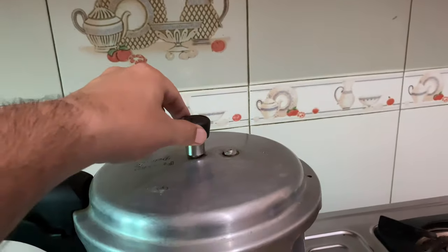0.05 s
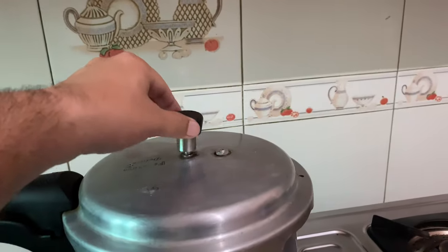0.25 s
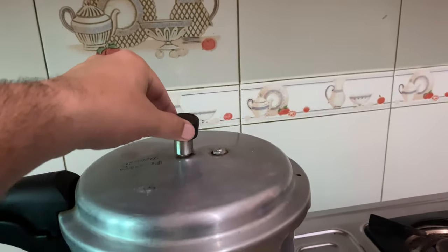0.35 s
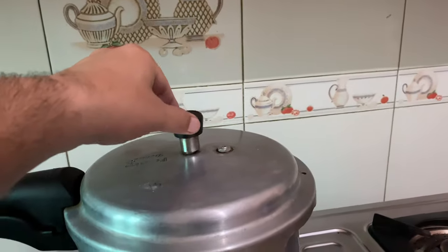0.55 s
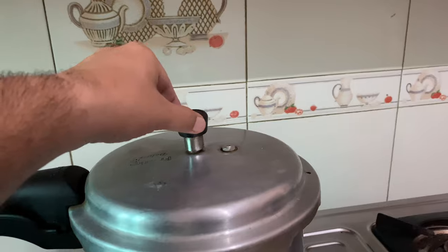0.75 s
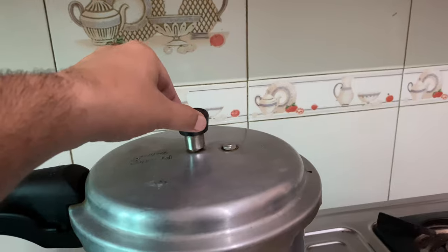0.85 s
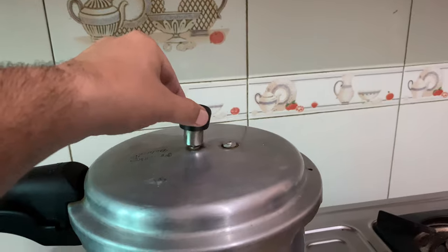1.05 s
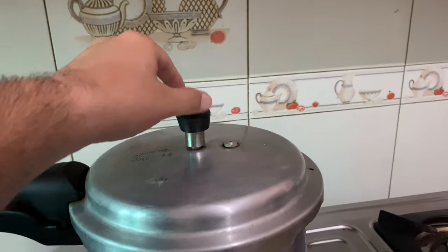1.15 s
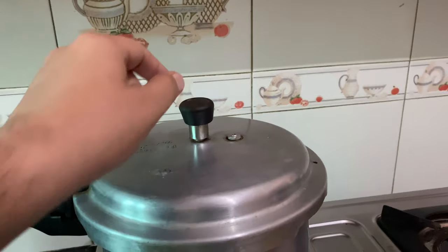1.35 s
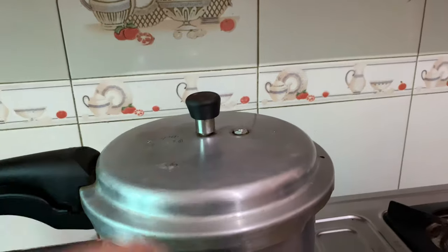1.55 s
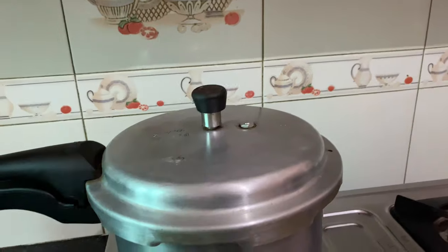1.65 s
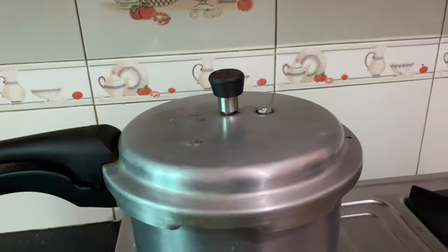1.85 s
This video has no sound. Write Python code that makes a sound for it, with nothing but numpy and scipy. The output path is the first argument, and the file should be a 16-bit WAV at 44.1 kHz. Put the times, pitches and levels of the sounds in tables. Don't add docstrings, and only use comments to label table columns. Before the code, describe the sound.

Pressure cooker steam escapes in three bright, abrupt hisses: a full burst at about 0.2-0.4 seconds, a quicker one at 0.65-0.8, and a softer one at 0.95-1.17. Light metal ticks come at 0.1; clustered clacks and scrapes of the weight on its pipe end each burst, strongest near 1.16. Short tiled-kitchen echoes fade into faint low hum. Close stereo phone pickup.

```python
import sys
import numpy as np
from scipy import signal
from scipy.fft import rfft, irfft
from scipy.io import wavfile
from scipy.ndimage import uniform_filter1d

SR = 44100
rng = np.random.default_rng(int(sys.argv[2]) if len(sys.argv) > 2 else 0)


def inscribe(sig):
    pcm = np.round(np.clip(np.atleast_2d(sig).T, -1, 1) * 32767)
    wavfile.write(sys.argv[1], SR, pcm.astype(np.int16))


def linear_from_db(decibels):
    return 10 ** (np.asarray(decibels, float) / 20)


N = 83790

# frequency in Hz, level in dB per Hz.
HUM_SPECTRUM = [(25, -48.5), (70, -3), (126, 2.5), (371, -8), (1090, -7.5), (3000, -14.5), (6000, -33.5),
                (15000, -38)]
# frequency in Hz, level in dB, width in Hz.
DRONE_TONES = [(119, -57, 11), (85.4, -60.5, 8.7), (153.7, -63.5, 5), (232, -64.5, 51)]
# frequency in Hz, time to fall 60 dB in seconds.
WALL_DECAY = [(250, 0.83), (1000, 0.42), (4000, 0.43), (8000, 0.32), (14000, 0.26)]

# start in seconds, level in dB, contact in seconds,
# pipe ring in dB, weight ring in dB.
TOUCHES = [ (.092, -39, .003, 9, 2), (.0938, -32, .0045, 6, 2), (.245, -42, 0.017, -1, -29),
           (.323, -34.5, 0.0081, -6.5, -26.5), (0.3829, -25, 0.0049, -12, -19),
           (.393, -25.5, 0.0035, -22, 2.5), (0.3998, -27, 0.0015, 7.5, -16), (.404, -27.5, 0.0038, 7, 1),
           (.412, -26.5, 0.001, 4.5, -13), (.419, -32, 0.001, 0, -15), (.429, -33.5, 0.0045, -18, -19),
           (0.458, -28.5, 0.0036, -14, -4.5), (.466, -35.5, 0.018, -9, -10), (.616, -48, .008, -14, -16),
           (.671, -27.5, 0.0092, -6, -11.5), (.771, -26, 0.01, 4, -13), (0.7746, -26.5, 0.0035, -6, -1.5),
           (.779, -23, 0.0047, -0.5, 1), (0.786, -26.5, 0.0034, 2, 2), (.791, -30, 0.0084, -1.5, -15),
           (.821, -33, 0.0039, -16, -10), (0.987, -43, 0.016, -14, -4.5), (1.038, -35.5, 0.006, 6.5, -19),
           (1.049, -35.5, 0.018, 1, -19), (1.088, -26, 0.0083, 4.5, -6), (1.092, -28.5, 0.0056, 0, -11),
           (1.103, -34.5, 0.0043, 12.5, 0.5), (1.1399, -23.5, 0.0037, -6, 3), (1.146, -28, 0.0091, 6, -11),
           (1.152, -24.5, 0.0048, 1, -11), (1.156, -29.5, .004, 3.5, -2), (1.16, -20.5, 0.0031, 0.5, 2.5),
           (1.167, -20, 0.0035, -0.5, 6.5), (1.174, -34, 0.002, 2, -4), (1.189, -44.5, 0.024, -18, -27), ]
# frequency in Hz, level in dB, time to fall 60 dB in seconds.
LID_MODES = [(161, -31, 0.42), (210.2, -25.5, 0.22), (294.2, -17, 0.14), (429.7, -8.5, 0.039),
             (573.4, -9, 0.0365), (710.7, -14.5, 0.11), (912, -4.5, 0.0297), (1039, -0.5, 0.013),
             (1252.5, 1.5, 0.014), (1481, 0.5, 0.0052), (1735, -3.5, 0.014), (2245, -3.5, 0.0034),
             (2464, -12, 0.088), (2654, -10, 0.056)]
PIPE_MODES = [(2850, -13, .01), (3120, -11, .012), (3470, -4, .018), (3700, -3.5, .011), (3850, -3, .011),
              (4100, -9, .012), (4550, -13, .012), (5300, -13, .01)]
WEIGHT_MODES = [(6310, -3.5, 0.0035), (6920, -6.5, 0.013), (7880, -16.5, 0.0044), (10360, -22, .004),
                (13200, -68, .003)]

# time in seconds, jet strength in dB.
LIFTS = [
    [(.175, -62), (.204, -31.5), (.238, -21), (.262, -15), (.29, -17.5), (.33, -16.5), (.37, -16),
     (.405, -29), (.43, -84)],
    [(.636, -60), (.645, -38), (.654, -31), (.668, -18.5), (.685, -17), (.73, -18.5), (.765, -17.5),
     (.79, -30), (.82, -83)],
    [(.925, -66.5), (.95, -31.5), (.984, -22), (1.04, -21), (1.09, -19), (1.12, -21), (1.15, -18),
     (1.17, -37), (1.19, -89.5)],
]
# frequency in Hz, level in dB per Hz.
JET_SPECTRUM = [(300, -23.5), (1000, -8), (2500, -6.5), (4500, -6), (7500, 0), (9500, 2), (10800, -7),
                (15500, -9.5)]
# frequency in Hz, width in Hz, boost in dB.
CAVITIES = [(3650, 1000, 4), (5240, 130, 7), (5820, 190, 7.5), (8210, 1200, 4.5), (8870, 340, 7.5),
            (9335, 310, 8), (12930, 1600, 9.5)]
# frequency in Hz, factor.
NARROWING = [(1000, 0.74), (4000, 1.66), (6500, 1.45), (9000, 0.85), (14000, 0.82)]
FIZZ_TIMES = [
    (.19, .255),
    (.65, .745),
    (1.055, 1.085),
]
# time in seconds, frequency in Hz.
CANCEL_PATH = [(.21, 3350), (.245, 3150), (.265, 2830), (.35, 2820), (.39, 2740), (.66, 3020), (.79, 3020),
               (.95, 2780), (1.045, 2780), (1.06, 2940), (1.14, 2960)]

# frequency in Hz, lead in radians.
LEFT_LEAD = [(0, 0), (1000, 1.2), (2300, 6.28), (2600, 8.6), (3000, 9.42), (3450, 10.3), (4350, 12.57),
             (6500, 12.4), (7900, 11.8), (9000, 8.8), (15100, -3.14), (15600, -5.5)]
# frequency in Hz, left over right in dB.
LEFT_TILT = [(600, -0.5), (1000, 0.5), (2400, -2.4), (3800, 2), (5600, -4.5), (8000, -0.2)]
# frequency in Hz, likeness from 0 to 1.
STEAM_LIKENESS = [(250, .97), (1000, .88), (1900, .6), (2300, .9), (2550, .99), (3450, .99), (4800, .55),
                  (7500, .6), (8600, .85)]
TOUCH_LIKENESS = [(250, .96), (1000, .88), (2400, .5), (3000, .1), (3800, .6), (4500, .35), (5300, .7),
                  (7900, .55), (8800, .85)]
ECHO_LIKENESS = [(250, 1), (700, 0.5), (1500, 0.12), (7000, 0.111), (9000, 0.37)]
HUM_LIKENESS = [(40, .8), (90, .98), (150, .99), (500, .5), (1000, .07), (6000, .1), (9000, .42)]
# frequency in Hz, level under the other in dB.
SPARE_LIMIT = [(1900, -30), (2300, -9), (2650, -6), (2880, -5.5), (3020, -8), (3300, -7), (4000, -10),
               (9300, -14), (9800, -5.5), (14500, -5.5), (15400, -12), (16000, -16)]

HUM_DB, STEADY_S = -51.5, .08
WET_DB, WALL_S = -6, 0.004
TICK_DB, LOW_HZ = -5, 130
ROUGH_DB, UNEVEN_DB = 2.5, 2.5
DETUNE = .025
PATCH_DB, SPUTTER_DB, WHISTLE_DB = 1.2, 1.3, 0.5
FIZZ_HZ, SHUT_DB = 15000, -30
CANCEL_HZ, CANCEL_SPAN_HZ = 3000, 600
TOP_HZ, TOP_LIKENESS = 9400, .95
EDGE_HZ = 15850


def evened(x):
    return x / np.sqrt(np.mean(x ** 2) + 1e-20)


def read(points, hz):
    f, value = np.transpose(points)
    return np.interp(np.log(hz + 1), np.log(f + 1), value)


def resonate(x, hz, width):
    turn = np.exp(2j * np.pi * hz * np.arange(x.shape[-1]) / SR)
    r = np.exp(-np.pi * abs(width) / SR)
    return 2 * (turn * signal.lfilter([1 - r], [1, -r], x / turn)).real


def hum():
    noise = rng.standard_normal((2, 2, N))
    colour = linear_from_db(read(HUM_SPECTRUM, np.fft.rfftfreq(N, 1 / SR)))
    wide = linear_from_db(HUM_DB) * evened(irfft(rfft(noise[0]) * colour, N))
    low = sum(linear_from_db(db) * evened(resonate(noise[1], hz, width)) for hz, db, width in DRONE_TONES)
    bass = signal.sosfilt(signal.butter(2, 200, fs=SR, output="sos"), wide) + low
    level = np.sqrt(abs(uniform_filter1d(bass ** 2, size=round(STEADY_S * SR))) + 1e-12)
    return wide + low + bass * (level.mean() / level - 1) / 2


def kitchen(x):
    taps = np.zeros((2, SR))
    at = np.arange(0, SR - 20, 20) + rng.integers(0, 20, (2, (SR - 1) // 20))
    np.put_along_axis(taps, at, rng.choice([-1., 1.], at.shape), axis=1)
    after_wall = np.arange(SR) > WALL_S * SR
    hz, t, z = signal.stft(taps * after_wall, SR, nperseg=256)
    decay = linear_from_db(-60 * t / read(WALL_DECAY, hz)[:, None])
    tail = signal.istft(z * decay, SR, nperseg=256)[1]
    return signal.fftconvolve(x, tail / np.linalg.norm(tail[0]), axes=1)[:, :N]


def touches():
    out, t = np.zeros((2, N + 6000)), np.arange(6000) / SR
    count = len(TOUCHES)
    grits, lumps = rng.standard_normal((2, count, 2, 1000))
    uneven, phases = rng.standard_normal((count, 3, 14)), rng.random((count, 3, 14, 2, 1))
    for touch, grit, lump, odd, phase in zip(TOUCHES, grits, lumps, uneven, phases):
        s, db, contact, pipe_db, weight_db = touch
        push = np.sin(np.pi * np.clip(t[:1000] / contact, 0, 1) ** 0.69)
        push = push * linear_from_db(ROUGH_DB * evened(uniform_filter1d(lump[0], size=40)))
        push = np.pad(push / push.max(), (0, 5000))
        sound = linear_from_db(TICK_DB + weight_db) * push * np.pad(grit, ((0, 0), (0, 5000)))
        parts = [LID_MODES, PIPE_MODES, WEIGHT_MODES]
        for modes, part_db, odds, turns in zip(parts, [0, pipe_db, weight_db], odd, phase):
            for (hz, mode_db, t60), one, turn in zip(modes, odds, turns):
                swell = signal.lfilter([1], [1, -linear_from_db(-60 / t60 / SR)], push)
                level = linear_from_db(mode_db + part_db + UNEVEN_DB * one)
                pitch = hz * (1 + DETUNE * (2 * turn[0] * 7 % 2 - 1))
                sound += level * swell / swell.max() * np.sin(2 * np.pi * (pitch * t + turn))
        at = round(s * SR)
        out[:, at:at + 6000] += linear_from_db(db + 1.5) * sound
    return signal.sosfilt(signal.butter(3, LOW_HZ, "high", fs=SR, output="sos"), out[:, :N])


def steam():
    frames, hz = N // 64 + 5, np.fft.rfftfreq(256, 1 / SR)
    t = np.arange(frames) * 64 / SR
    lifts_db = [np.interp(t, *np.transpose(lift), left=-99, right=-99) for lift in LIFTS]
    jet_db = np.max(lifts_db, axis=0)
    cavity_db = sum(db / (1 + (2 * (hz - f) / width) ** 2) for f, width, db in CAVITIES)
    shape_db = read(JET_SPECTRUM, hz) + cavity_db

    draw = rng.standard_normal((frames, 129, 5)).T
    patches = uniform_filter1d(uniform_filter1d(draw[4], size=4, axis=0), size=16, axis=1)
    sputter = evened(uniform_filter1d(rng.standard_normal(frames), size=3))
    field_db = shape_db[:, None] + PATCH_DB * evened(patches) + SPUTTER_DB * sputter

    gap_db = read(NARROWING, hz)[:, None] * (jet_db + 22.5) - 23.5
    fizzing = sum((t > start) & (t < end) for start, end in FIZZ_TIMES)
    gap_db = gap_db + SHUT_DB * (hz > FIZZ_HZ)[:, None] * (1 - fizzing)
    z = (draw[:2] + 1j * draw[2:4]) * linear_from_db(field_db + gap_db) / np.sqrt(np.sum(linear_from_db(2 * shape_db)))
    hiss = signal.istft(z, nperseg=256, noverlap=192)[1][:, :N]
    lines = linear_from_db(WHISTLE_DB * evened(uniform_filter1d(rng.standard_normal(N // 2 + 1), size=60)))
    return irfft(rfft(hiss) * lines / np.sqrt(np.mean(lines ** 2)), N)


def ports(x, likeness):
    hz, z = np.fft.rfftfreq(2 * N, 1 / SR), rfft(x, 2 * N)
    same = np.clip(np.where(hz > TOP_HZ, TOP_LIKENESS, read(likeness, hz)), 0, 1)
    tilt = linear_from_db(read(LEFT_TILT, hz) / 2)
    shared = same * z[0] * np.exp(-1j * np.interp(hz, *np.transpose(LEFT_LEAD)))
    own = np.sqrt(1 - same ** 2) * z[1]
    return irfft([z[0] * tilt, (shared + own) / tilt])[:, :N]


def sway(pair):
    hz, t, z = signal.stft(pair[1], SR, nperseg=1024, noverlap=768)
    lead = np.transpose(LEFT_LEAD)
    pitch = np.interp(t, *np.transpose(CANCEL_PATH))
    turn = np.interp(CANCEL_HZ, *lead) - np.interp(pitch, *lead)
    span = np.exp(-((hz - CANCEL_HZ) / CANCEL_SPAN_HZ) ** 4)
    z = z * np.exp(-1j * span[:, None] * turn)
    return np.array([pair[0], signal.istft(z, SR, nperseg=1024, noverlap=768)[1][:N]])


def spare(x):
    hz, t, z = signal.stft([x[0] + x[1], x[0] - x[1]], SR, "cosine", nperseg=2048)
    power = uniform_filter1d(uniform_filter1d(abs(z) ** 2, size=16, axis=1), size=2, axis=2)
    power = np.repeat(power[:, 4::8], 8, axis=1)[:, :1024]
    z[:, :1024] *= power > power[::-1] * linear_from_db(2 * read(SPARE_LIMIT, hz[:1024]))[:, None]
    mid, side = signal.istft(z, SR, "cosine", nperseg=2048)[1][:, :N] / 2
    return np.array([mid + side, mid - side])


def scene():
    jet, taps = steam(), touches()
    near = sway(ports(jet, STEAM_LIKENESS)) + ports(taps, TOUCH_LIKENESS)
    echo = ports(linear_from_db(WET_DB) * kitchen(jet + taps), ECHO_LIKENESS)
    return near + echo + ports(hum(), HUM_LIKENESS)


def low_pass(x):
    return signal.sosfilt(signal.butter(12, 15900, fs=SR, output="sos"), x)


def record(dry):
    edge = signal.firwin(1023, EDGE_HZ, fs=SR)[None]
    mix = spare(signal.oaconvolve(dry, edge, "same"))
    return low_pass(mix)


dry = scene()
out = record(dry)
inscribe(out)
```